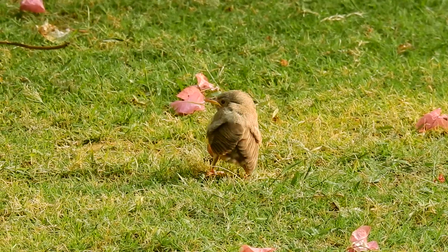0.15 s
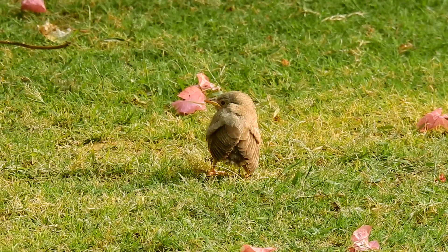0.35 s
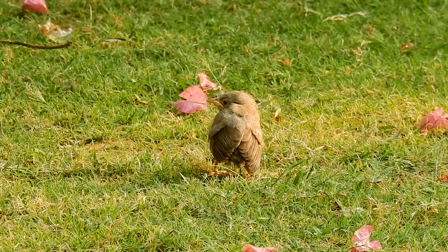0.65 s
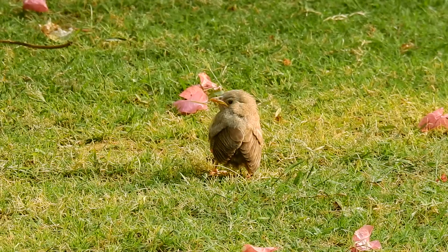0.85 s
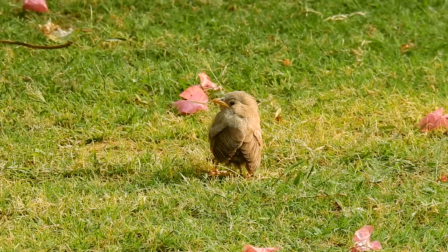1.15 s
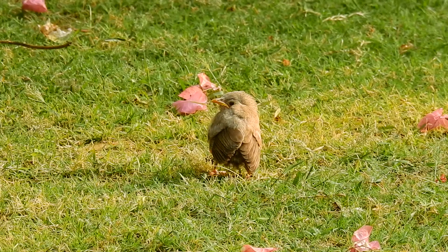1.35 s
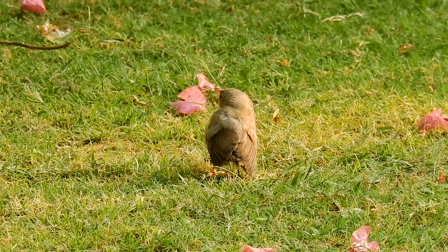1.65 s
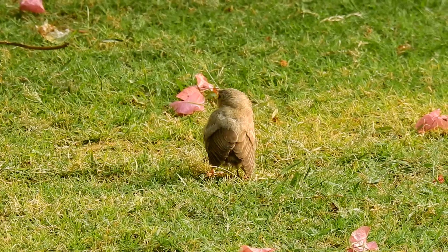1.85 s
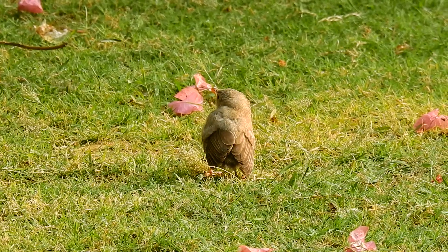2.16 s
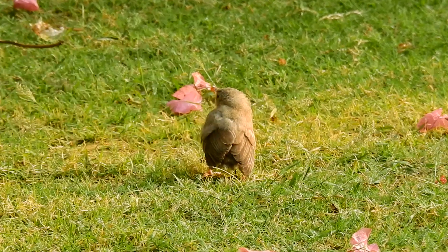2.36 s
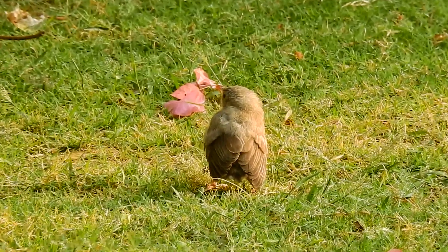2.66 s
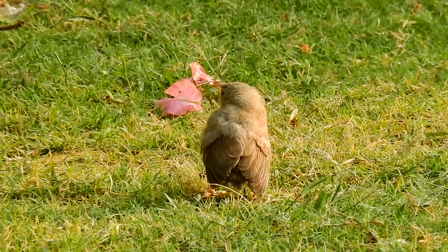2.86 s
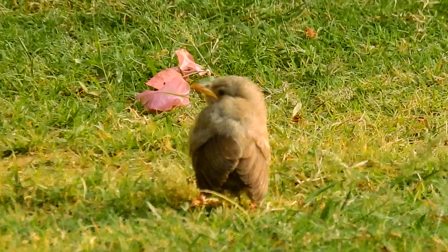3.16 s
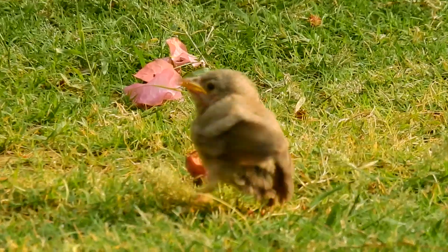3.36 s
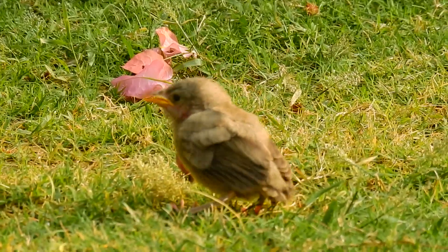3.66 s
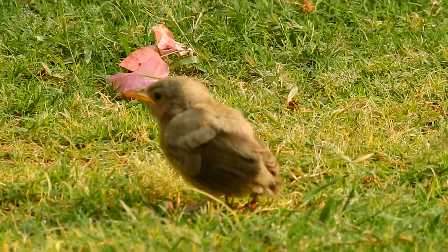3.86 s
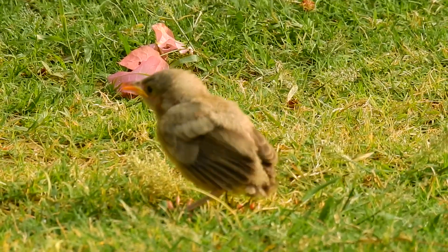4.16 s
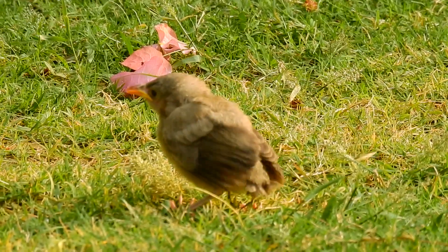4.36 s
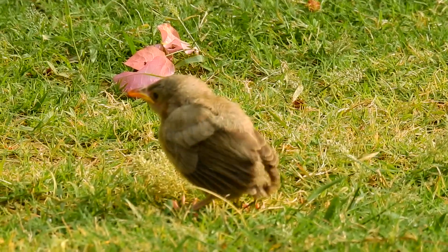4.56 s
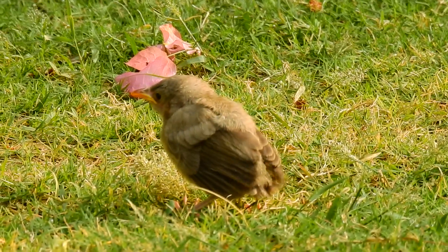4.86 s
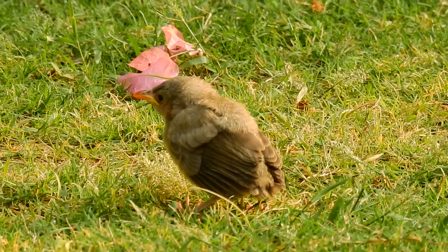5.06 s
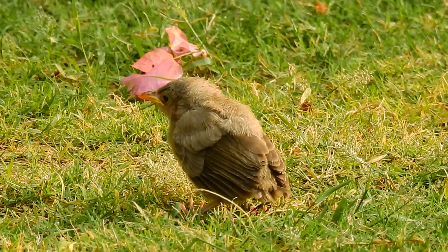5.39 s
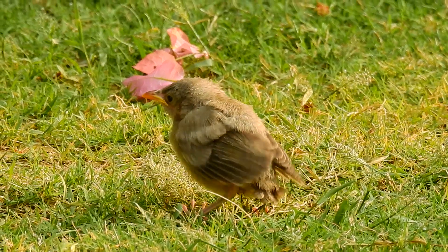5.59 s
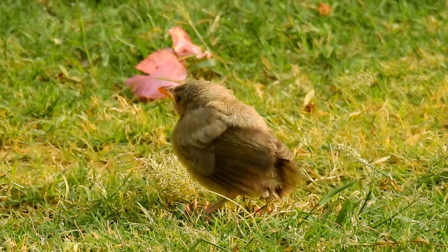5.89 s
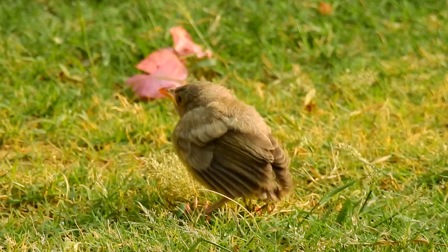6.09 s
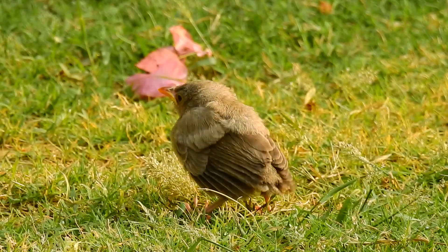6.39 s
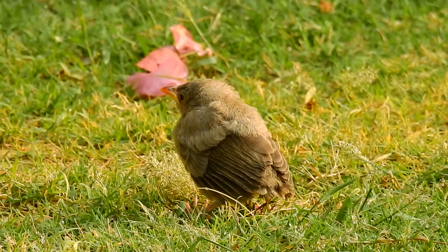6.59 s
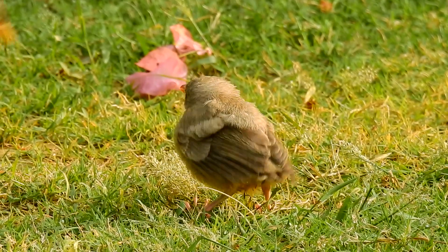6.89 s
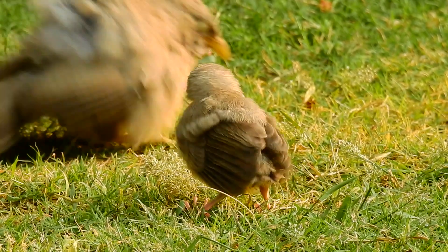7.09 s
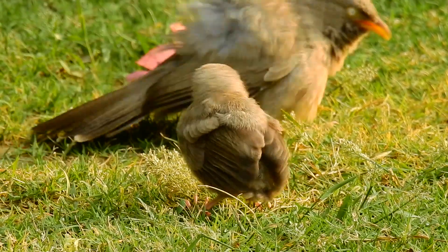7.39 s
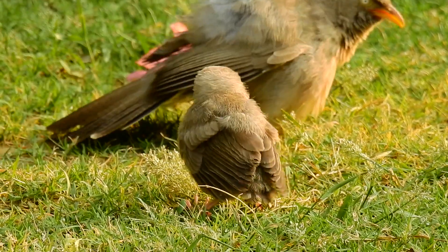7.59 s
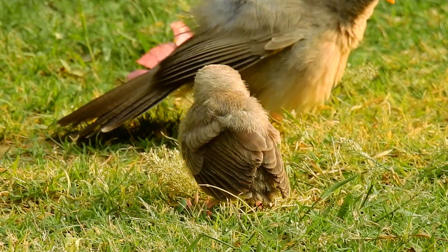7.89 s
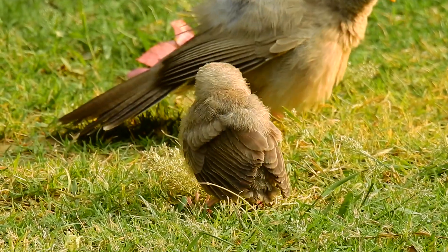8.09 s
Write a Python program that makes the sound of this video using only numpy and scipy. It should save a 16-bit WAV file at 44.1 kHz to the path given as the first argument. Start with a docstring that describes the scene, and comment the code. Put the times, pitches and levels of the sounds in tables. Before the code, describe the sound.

A group of birds chirps, squawks and gives short downward-sliding whistles, often overlapping, against faint outdoor air.

```python
"""A family of babblers calls on a garden lawn, over a low rumble and the hiss of the air.
Falling begging whistles open the scene, with scuffs close by. Near 1 s buzzy, frequency-modulated chips
join in and a bigger bird calls far off; until about 3 s a hand-held camera body booms at its resonance.
From 1.5 s come harsh nasal squawks, syrinx pulses filtered by throat and beak, thickest around 4 s.
Grass ticks in the later seconds as the calls go on, and walls and trees reflect them to the end."""
import sys
import numpy as np
from scipy import signal
from scipy.fft import rfft, irfft
from scipy.io import wavfile
from scipy.ndimage import uniform_filter1d

SR = 44100
rng = np.random.default_rng(int(sys.argv[2]) if len(sys.argv) > 2 else 0)


def dump(signal):
    """Clip the signal to [-1, 1] and save it as 16-bit WAV at the path in sys.argv[1]."""
    limited = np.clip(np.atleast_2d(signal).T, -1, 1)
    pcm = np.round(limited * 32767).astype(np.int16)
    wavfile.write(sys.argv[1], SR, pcm)


N = 363384

# Levels in the tables are those of the sources, ahead of echoes and mixing gains.
# begging whistles: start_s, clears_s, end_s, start_hz, mid_hz, end_hz, level_db, relative_octave_db
WHISTLES = [ (0.072, .2, 0.32, 3975, 3680, 3596, -50.5, -27),
            (0.696, 0.828, 1.044, 4048, 3680, 3430, -38.5, -40),
            (2.438, 2.6, 2.75, 3960, 3674, 3364, -42.5, -18.5),
            (2.791, 2.913, 3.16, 4175, 3695, 3440, -35.5, -28),
            (4.512, 4.569, 4.61, 3854, 3440, 3040, -42, -13),
            (4.968, 5.117, 5.355, 4000, 3616, 3302, -37, -19.5),
            (5.418, 5.524, 5.61, 3840, 3690, 3470, -47, -15),
            (5.767, 5.816, 5.86, 3950, 3580, 3470, -53, -16),
            (6.229, 6.355, 6.475, 3750, 3675, 3430, -55.5, -27),
            (6.521, 6.726, 6.946, 4076, 3657, 3408, -35.5, -24.5),
            (7.479, 7.655, 7.76, 3900, 3736, 3435, -47, -24),
            (7.952, 8.083, 8.24, 3850, 3582, 3430, -47.5, -35)]
# nasal calls: start_s, break_s, end_s, attack_s, effort_db, pitch_hz, first_roughness (0-1),
# last_roughness (0-1), throat_hz, upper_resonance_db, fundamental_db
NASALS = [ (1.55, 1.593, 1.66, 0.046, -34.5, 1187, 0.42, 0.65, 2090, -13.5, 0.5),
          (1.865, 1.902, 1.965, 0.0058, -36, 1192, 0.57, 0.83, 3680, -21, -16),
          (3.443, 3.503, 3.56, 0.027, -25, 1268, 0.46, 0.54, 3190, -13.5, -10.5),
          (4.864, 4.933, 4.96, .019, -31, 1203, 0.47, .75, 2920, -15, -19),
          (7.012, 7.109, 7.2, 0.024, -26, 1280, .48, 0.88, 3750, -13, -31.5),
          (7.295, 7.396, 7.375, 0.02, -28.5, 1250, 0.54, 0.4, 2580, -25, -24),
          (8.03, 8.119, 8.125, 0.025, -46, 1215, 0.33, .45, 2000, -25, -29)]
# rasps: start_s, crest_s, end_s, then at the crest: effort_db, pitch_hz, roughness (0-1), throat_hz,
# upper_resonance_db, spill_db
RASPS = [ (1.632, 1.7, 1.77, -34, 1240, 0.78, 2830, -17, -2),
         (1.749, 1.789, 1.9, -31.5, 1020, 0.74, 3100, -20.5, -18),
         (3.514, 3.549, 3.62, -29, 1169, 0.5, 2980, -13, -5),
         (3.601, 3.669, 3.74, -36.5, 962, 0.55, 2860, -12.5, -2.5),
         (3.723, 3.781, 3.85, -27, 1085, 0.83, 3300, -23, -22),
         (3.775, 3.853, 3.905, -24.5, 1254, 0.96, 3550, -3, -15),
         (3.97, 3.992, 4.07, -41, 1472, 0.52, 2820, -34, -24),
         (4.045, 4.118, 4.175, -29.5, 1039, 0.86, 3110, -13, -15),
         (4.262, 4.274, 4.34, -46.5, 1438, 0.64, 2770, -35, -17),
         (4.322, 4.4, 4.48, -31.5, 1030, 0.71, 3200, -12.5, -18),
         (4.887, 4.963, 5.09, -31, 1200, 0.67, 3320, -16, -10),
         (7.339, 7.376, 7.52, -32.5, 1364, 0.8, 2970, -31, -39),
         (7.42, 7.499, 7.61, -37, 1258, 0.65, 2470, -62, -28),
         (7.53, 7.589, 7.7, -43.5, 1058, 0.7, 2150, -34, -18)]
# buzzy chips: start_s, end_s, pitch_hz, glide_share, level_db
CHIPS = [ (0.986, 1.056, 5740, -0.0017, -32), (1.01, 1.063, 6980, -0.029, -46.5),
         (1.26, 1.352, 5580, 0.11, -29), (2.345, 2.428, 5760, -0.092, -35.5),
         (2.534, 2.603, 4320, 0.25, -49.5), (2.72, 2.82, 4260, 0.21, -32.5), (3.034, 3.142, 4084, 0.3, -33),
         (3.319, 3.387, 5620, 0.024, -46), (6.577, 6.685, 5300, .13, -39.5),
         (7.791, 7.87, 5030, 0.077, -49.5)]
# short clear tones (peeps, and ringing partials and tails of the squawks, chips and whistles):
# start_s, end_s, pitch_hz, glide_share, level_db
CLEAR_TONES = [ (0.365, 0.384, 1484, 0.022, -37), (0.369, 0.423, 4560, -0.12, -47),
               (1.585, 1.601, 3337, -0.014, -38), (1.711, 1.835, 6010, -0.0081, -50),
               (1.764, 1.795, 3060, 0.025, -34), (1.908, 1.929, 1672, 0.0021, -43.5),
               (1.923, 1.951, 2110, 0.003, -40), (2.034, 2.057, 2300, -0.057, -51),
               (2.144, 2.17, 2055, -0.005, -55), (2.429, 2.567, 3256, -0.023, -40.5),
               (2.775, 2.832, 5100, 0.013, -36.5), (3.088, 3.147, 5080, 0.025, -39),
               (3.232, 3.258, 2640, 0.025, -45.5), (3.636, 3.675, 2020, -.04, -42),
               (3.65, 3.685, 3900, -0.038, -37.5), (3.789, 3.861, 1398, 0.11, -41),
               (3.879, 3.929, 4450, -0.047, -40.5), (4.014, 4.063, 1583, -0.021, -44.5),
               (4.488, 4.53, 5080, -0.029, -47), (4.93, 5.019, 4870, 0.066, -40),
               (5.144, 5.205, 2576, -0.079, -36), (5.971, 6.03, 4730, 0.051, -54.5),
               (6.01, 6.082, 6490, .015, -50.5), (6.42, 6.454, 2290, 0.084, -44),
               (6.472, 6.508, 2885, -0.06, -40.5), (6.5, 6.533, 2140, -0.01, -44.5),
               (7.007, 7.03, 4550, -0.087, -36.5), (7.011, 7.033, 8870, -0.14, -49),
               (7.084, 7.098, 2533, -0.011, -35), (7.127, 7.181, 2071, -.02, -41),
               (7.163, 7.178, 4406, 0.016, -23), (7.332, 7.353, 2470, 0.0012, -27)]
# calls of the bigger bird: start_s, end_s, pitch_hz, fundamental_db, octave_db, flutter_share
FAR_CALLS = [ (0.924, 1.022, 622.3, -38.5, -52.5, 0.075), (1.039, 1.102, 625, -43.5, -66, 0.064),
             (1.15, 1.233, 607.4, -52, -50.5, 0.14), (1.181, 1.322, 686, -50.5, -52.5, 0.055),
             (3.276, 3.35, 987, -53, -74, 0.096), (5.517, 5.735, 578, -57, -56, .12),
             (7.838, 7.898, 830, -67, -54.5, 0.12)]
# scuffs close by: start_s, level_db, rise_s, decay_s, lower_ring_hz, upper_ring_hz, relative_upper_db
SCUFFS = [ (0.356, -40.5, 0.0033, 0.013, 2840, 6600, -7), (.47, -52.5, 0.0036, 0.014, 2200, 6650, -3),
          (.579, -47, 0.003, 0.021, 2600, 7020, 3.5), (.635, -37, 0.0022, 0.0023, 1710, 2580, 0),
          (.644, -39, 0.001, 0.0068, 1770, 2600, -6), (1.484, -38.5, 0.0027, 0.0038, 2700, 4220, -4),
          (1.64, -32, 0.0042, 0.0071, 2460, 6860, -5.5)]
# taps and soft knocks: start_s, level_db, centre_hz, width_hz, rise_s, decay_s
KNOCKS = [(.364, -36.5, 1400, 695, 0.0045, 0.009), (.374, -39, 900, 1300, .002, 0.0055),
          (.376, -30.5, 4200, 2000, .001, 0.0032), (1.637, -25, 507, 590, 0.0018, 0.015)]
# ticks in the grass: start_s, level_db, centre_hz, decay_s
TICKS = [(3.291, -45.5, 6100, 0.0096), (4.857, -48, 9100, 0.0059), (4.88, -54, 9650, 0.01),
         (5.105, -60, 8500, 0.0067), (5.205, -61, 9300, .005), (5.63, -47, 7600, 0.0035),
         (5.644, -52, 7840, .004), (6.183, -45.5, 6900, 0.0047), (6.2, -53, 7200, .005),
         (6.268, -63, 9300, .004), (6.799, -52, 9900, 0.0024), (6.807, -54, 10200, .003)]
# booms of the camera body: start_s, end_s, level_db
BOOMS = [(.56, 0.76, -40), (1.30, 1.51, -36), (1.69, 1.788, -32), (1.83, 1.968, -32.5), (1.96, 2.038, -27),
         (2.04, 2.11, -34.5), (2.31, 2.552, -31.5), (2.68, 2.88, -39.5), (2.95, 3.24, -42.5)]
# course of the low rumble and of the garden air: time_s, level_db
RUMBLE_LEVEL = [(0, -55.5), (.6, -51), (1.9, -45), (3.2, -43), (3.35, -51), (4.3, -49.5), (5.3, -47.5),
                (7.4, -48), (8.24, -52)]
AIR_LEVEL = [(0, -54), (1, -49.5), (2.2, -51), (3, -48), (4.7, -50.5), (6, -54.5), (7.4, -50), (8.24, -53)]
# their spectra: frequency_hz, relative_density_db
RUMBLE_SPECTRUM = [(25, -58), (50, -48), (70, -11.5), (100, -20.5), (135, -15), (162, 2), (185, -5.5),
                   (240, -10.5), (330, -28), (600, -59)]
AIR_SPECTRUM = [(30, -53), (60, -27.5), (120, -4.5), (280, -3), (450, -3.5), (700, -8), (1200, -12),
                (2200, -15.5), (4000, -15), (6800, -16), (8200, -26.5), (10000, -41), (14000, -63.5)]
# left-right likeness of both noises: frequency_hz, correlation (0-1)
NOISE_COHERENCE = [(40, 0.92), (140, 1), (700, .98), (2000, 0.98), (5000, 0.24), (9000, 0.081)]
# reverberation time among the trees: frequency_hz, t60_s
TREE_T60 = [(500, 0.52), (2000, 0.27), (4000, 0.26), (8000, 0.16)]
# weight of the difference between the two microphones: frequency_hz, gain_db
STEREO_WIDTH = [(300, -24), (650, -18), (1200, -5), (4000, -4), (9000, 6.5)]

FULL_WHISTLE_DB, SWING_DB_PER_DB = -35, .25  # a weaker whistle swings less widely
HOARSE_SWING_HZ, CLEAR_SWING_HZ, WAVER_HZ = 190, 58, 27  # swings at full effort; slow waver
HOARSE_DB, LATE_DB = -3.5, -7.5  # opening and ending of a whistle, against its middle
CLEAR_STEP_HZ, CLEARING_S = 87.5, .004  # pitch step if the voice clears midway, less near the ends
END_DROOP_HZ, END_DROOP_S = 109, 0.037  # the pitch sinks as the breath runs out
ONSET_DB, CUTOFF_DB, RELEASE_S = -19, -22, 0.022  # envelope of a nasal call
BREAK_S, PITCH_DROP, ROUGH_LAG_S = 0.025, .2, .018  # its break: pitch drops, roughness follows
RASP_RISE_DB, RASP_FALL_DB, RASP_ARCH = -12, -20, 1.71  # envelope of a rasp
ROUGH_PER_DB, RASP_SAG_PER_S = -0.27, 1.3  # a rasp roughens off its crest; its pitch sinks steadily
THROAT_HZ_PER_DB = 23.5  # the throat resonance rises as the beak opens with effort
BEAK_LOW_HZ, BEAK_HIGH_HZ = 1390, 7320  # the band that a babbler radiates well
RATTLE_HZ, RATTLE_DB = 280, 4  # amplitude modulation of a fully rough voice
CHIP_FLUTTER_SHARE, CLEAR_TONE_FLUTTER_HZ = .075, 90


def whistle(start, clears, end, start_hz, mid_hz, end_hz, db, octave_db):
    """Frequency modulation makes a falling tone hoarse; it narrows as the voice clears, then widens."""
    t = np.arange(start, end, 1 / SR)
    progress = np.linspace(0, 1, len(t))
    opened = .5 + .5 * np.tanh((t - clears) / CLEARING_S)
    fading = np.interp(progress, [.68, .95], [0, 1])
    clear = opened * (1 - .5 * fading)
    push = gain_of(SWING_DB_PER_DB * (db - FULL_WHISTLE_DB))
    depth_hz = push * (HOARSE_SWING_HZ * (1 - clear) + CLEAR_SWING_HZ * clear)
    swing = depth_hz * flutter(len(t), rate_hz=140, unevenness=.3)
    slide = np.polyval(np.polyfit([0, .5, 1], [start_hz, mid_hz, end_hz], 2), progress)
    step = CLEAR_STEP_HZ * (progress - opened) * np.sin(np.pi * progress)
    droop = END_DROOP_HZ * np.exp((t - end) / END_DROOP_S)
    phase = phase_of(slide + step - droop + swing + WAVER_HZ * wander(len(t), rate_hz=60))
    level_db = db + HOARSE_DB * (1 - opened) + LATE_DB * fading
    tremble_db = (3.3 - 1.1 * clear) * wander(len(t), rate_hz=90)
    onset_db = -7 * np.exp(-progress / 0.05)
    tone = np.sin(phase) + gain_of(octave_db) * (1 - progress) * np.sin(2 * phase)
    return start, gain_of(level_db + tremble_db + onset_db) * unit_rms(tone) * tukey(len(t), .1)


def nasal(start, breaks, end, attack, db, hz, first_rough, last_rough, throat_hz, upper_db, low_db):
    """A register break: a reedy note swells, then drops in pitch and mostly turns rougher."""
    t = np.arange(start, end, 1 / SR)
    swell_db = ONSET_DB * np.exp((start - t) / attack) + CUTOFF_DB * np.exp((t - end) / RELEASE_S)
    broken = .5 + .5 * np.tanh((t - breaks) / BREAK_S)
    rough = first_rough + (last_rough - first_rough) * np.interp(t - ROUGH_LAG_S, t, broken)
    pitch = hz * (1 - PITCH_DROP * broken)
    throat = throat_hz + THROAT_HZ_PER_DB * swell_db
    return squawk(t, db + swell_db, pitch, rough, throat, upper_db, spill_db=-18.5, fundamental_db=low_db)


def rasp(start, crest, end, db, hz, crest_rough, throat_hz, upper_db, spill_db):
    """Effort governs timbre: level, throat resonance and treble rise and fall in one harsh push."""
    t = np.arange(start, end, 1 / SR)
    off_crest = np.interp(t, [start, crest, end], [1, 0, 1])
    swell_db = np.where(t < crest, RASP_RISE_DB, RASP_FALL_DB) * off_crest ** RASP_ARCH
    rough = crest_rough + ROUGH_PER_DB * swell_db
    pitch = hz * (1 - RASP_SAG_PER_S * (t - crest))
    throat = throat_hz + THROAT_HZ_PER_DB * swell_db
    return squawk(t, db + swell_db, pitch, rough, throat, upper_db + swell_db, spill_db)


def squawk(t, effort_db, hz, rough, throat_hz, upper_db, spill_db, fundamental_db=-23):
    """Source and filter: harmonics and breath noise from the syrinx are shaped by throat and beak."""
    size = len(t)
    rough = np.clip(rough, 0, 1)
    jitter = 0.106 * rough ** 2 * wander(size, rate_hz=250)
    phase = phase_of(hz * (1 + jitter))
    harmonics = [gain_of(3.8 * wander(size, rate_hz=100)) * np.cos(k * phase) for k in range(1, 11)]
    # air hisses through the syrinx each time it opens
    breath = .65 * rough ** 2 * (1 + np.cos(phase)) * rng.standard_normal(size)
    drive = unit_rms(sum(harmonics)) + breath
    # a wide-open beak lets out more treble and damps the throat, which broadens it
    throat_width_hz = 1100 * np.exp(0.016 * (np.mean(upper_db) + 28.5))
    body = resonate(drive, throat_hz + 200 * rough * wander(size, rate_hz=13.3), throat_width_hz)
    # the more sound spills past the throat, the wider its band
    spill = resonate(drive, throat_hz + 250, width_hz=2800 * (0.78 + gain_of(spill_db)), order=6)
    upper = resonate(drive, hz=6900, width_hz=1300)
    voice = body + gain_of(spill_db) * spill + gain_of(upper_db) * upper
    voice = signal.sosfilt(signal.butter(2, BEAK_LOW_HZ, "high", fs=SR, output="sos"), voice)
    voice = signal.sosfilt(signal.butter(14, BEAK_HIGH_HZ, fs=SR, output="sos"), voice)
    # only the hardest pushes wake the top resonance
    voice += gain_of(2.6 * upper_db - 24.5) * resonate(drive, hz=11300, width_hz=1500, order=4)
    voice += gain_of(fundamental_db) * np.cos(phase)  # the fundamental leaks past the throat
    rattle_db = rough ** 2 * RATTLE_DB * flutter(size, RATTLE_HZ, unevenness=.3)
    tremble_db = 2.2 * rough * wander(size, rate_hz=90)
    return t[0], gain_of(effort_db + rattle_db + tremble_db) * unit_rms(voice) * tukey(size, .04)


def chip(start, end, start_hz, glide, db, flutter_hz, rate_hz, taper):
    """Fast frequency modulation adds sidebands to a short glide; a wide swing is heard as a buzz."""
    size = round((end - start) * SR)
    progress = np.linspace(0, 1, size)
    swing = flutter_hz * flutter(size, rate_hz, unevenness=0.436)
    hz = start_hz * (1 + glide * np.sin(progress * np.pi / 2)) + swing
    tremble = gain_of(3.5 * wander(size, rate_hz / 2))
    tone = unit_rms(np.sin(phase_of(hz)) * tremble)
    return start, gain_of(db + 3.5 * (1 - progress)) * tone * tukey(size, taper)


def small_notes():
    """Modulation depth sets the timbre: wide in buzzy chips and chatter, narrow in short clear tones."""
    buzzy = [chip(start, end, hz, glide, db, CHIP_FLUTTER_SHARE * hz, rate_hz=240, taper=0.54)
             for start, end, hz, glide, db in CHIPS + chatter()]
    clear = [chip(*row, CLEAR_TONE_FLUTTER_HZ, rate_hz=260, taper=0.25) for row in CLEAR_TONES]
    return gather(buzzy + clear)


def chatter(db=-61, low_hz=900, high_hz=6500, count=80):
    """Independent callers around the garden give faint notes at random times, as rows like CHIPS."""
    rows = []
    for when, length, pitch, glide, loudness in rng.random((count, 5)):
        start, hz = when * N / SR, low_hz * (high_hz / low_hz) ** pitch
        end = start + 0.0582 + 0.109 * length
        rows.append((start, end, hz, 0.19 * glide - .12, db + 6 * (loudness - .5)))
    return rows


def far_bird(sag_share=.035, third_db=-12):
    """Attenuation with distance: only three harmonics of the bigger bird's sagging notes arrive."""
    return gather(chip(start, end, k * hz, -sag_share, db, hoarse * k * hz, rate_hz=90, taper=0.55)
                  for start, end, hz, low_db, octave_db, hoarse in FAR_CALLS
                  for k, db in enumerate([low_db, octave_db, octave_db + third_db], 1))


def far_flock(db=-66, low_hz=450, high_hz=1300, count=26, sag_share=0.0997):
    """Harmonic series of three partials glide down: faint calls from distant trees."""
    notes = []
    for when, length, pitch, loudness in rng.random((count, 4)):
        start, hz = when * N / SR, low_hz * (high_hz / low_hz) ** pitch
        end = start + 0.0503 + 0.0814 * length
        level_db = db + 6 * (loudness - .5)
        notes += [chip(start, end, k * hz, -sag_share, level_db, 0.025 * k * hz, rate_hz=90, taper=0.8)
                  for k in (1, 2, 3)]
    return gather(notes)


def burst(start, db, hz, width_hz, rise_s, decay_s):
    """Contact noise in one broad resonance rises linearly and decays exponentially."""
    t = np.arange(SR // 5) / SR
    envelope = np.minimum(t / rise_s, 1) * np.exp(-np.maximum(t - rise_s, 0) / decay_s)
    return start, gain_of(db) * envelope * resonate(rng.standard_normal(len(t)), hz, width_hz, order=3)


def contacts(ring_width_share=0.18, hiss_db=-4):
    """Contact excites resonances: two rings over a broad hiss in a scuff, a single band in a knock."""
    scuffs = []
    for start, db, rise, decay, low_hz, high_hz, high_db in SCUFFS:
        for hz, ring_db in [(low_hz, 0), (high_hz, high_db)]:
            scuffs.append(burst(start, db + ring_db, hz, ring_width_share * hz, rise, decay))
        scuffs.append(burst(start, db + hiss_db, hz=3700, width_hz=3800, rise_s=rise, decay_s=decay))
    knocks = [burst(*row) for row in KNOCKS]
    return signal.sosfilt(signal.butter(2, 190, "high", fs=SR, output="sos"), gather(scuffs + knocks))


def grass_ticks():
    """Dry blades of grass snap; so brief a transient has a broad spectrum."""
    return gather(burst(start, db, hz, width_hz=3500, rise_s=0.00069, decay_s=decay)
                  for start, db, hz, decay in TICKS)


def boom(start, end, db, hz=162, waver_hz=13):
    """Forced vibration: the shifting hand drives the camera body at its one low resonance."""
    size = round((end - start) * SR)
    phase = phase_of(hz + waver_hz * wander(size, rate_hz=71))
    tone = unit_rms(np.sin(phase) * tukey(size, .7))
    return start, gain_of(db + 2 * wander(size, rate_hz=50)) * tone


def background(spectrum, levels, patchy_db):
    """Partly coherent outdoor noise with drifting patches, nearly alike on both sides in the bass."""
    hz = np.fft.rfftfreq(2048, 1 / SR)
    real, imag, other_real, other_imag, patches = rng.standard_normal((N // 512 + 5, len(hz), 5)).T
    patches = unit_rms(uniform_filter1d(uniform_filter1d(patches, 20, axis=0), 10, axis=1))
    coherence = at_frequency(NOISE_COHERENCE, hz)[:, None]
    left = real + 1j * imag
    right = coherence * left + np.sqrt(1 - coherence ** 2) * (other_real + 1j * other_imag)
    spectra = np.array([left, right]) * gain_of(at_frequency(spectrum, hz)[:, None] + patchy_db * patches)
    noise = unit_rms(signal.istft(spectra, nperseg=2048, noverlap=1536)[1][:, :N])
    return noise * gain_of(np.interp(np.arange(N) / SR, *np.transpose(levels)))


def garden(x, walls_db, trees_db, right_db, wall_decay_s, sideways=0.6, echoes_per_s=500):
    """Direct sound is joined by early reflections from walls and diffuse reverberation from trees."""
    t = np.arange(SR // 2) / SR
    walls = rng.standard_normal(len(t)) * (rng.random(len(t)) < echoes_per_s / SR)
    walls *= (t > .003) * np.exp(-t / wall_decay_s)
    hz, when, spectra = signal.stft(rng.standard_normal((2, len(t))) * (t > .004), SR, nperseg=256)
    decay = gain_of(-60 * when / at_frequency(TREE_T60, hz)[:, None])
    trees = signal.istft(spectra * decay, SR, nperseg=256)[1][:, :len(t)]
    directions = 1 + sideways * rng.standard_normal(len(t)) * np.array([[1], [-1]])
    walls = walls / np.linalg.norm(walls) * directions
    response = gain_of(walls_db) * walls + gain_of(trees_db) * trees / np.linalg.norm(trees[0])
    echoes = signal.fftconvolve(x[None], response, axes=1)[:, :N]
    return (x + echoes) * gain_of([[-right_db / 2], [right_db / 2]])


def microphones(x):
    """Two close capsules receive long wavelengths alike and differ in the treble."""
    mid, side = x.mean(0), (x[0] - x[1]) / 2
    side = irfft(rfft(side) * gain_of(at_frequency(STEREO_WIDTH, np.fft.rfftfreq(N, 1 / SR))), N)
    return np.array([mid + side, mid - side])


def resonate(x, hz, width_hz, order=2):
    """A movable resonance by heterodyning: shift down, low-pass, shift back, scale to rms 1."""
    carrier = np.exp(1j * phase_of(hz * np.ones(len(x))))
    lowpass = signal.butter(order, min(abs(width_hz), SR / 2) / 2, fs=SR, output="sos")
    return unit_rms((carrier * signal.sosfilt(lowpass, x / carrier)).real)


def flutter(size, rate_hz, unevenness):
    """An oscillation between -1 and 1 at an unsteady rate."""
    return np.sin(phase_of(rate_hz * (1 + unevenness * wander(size, rate_hz))))


def wander(size, rate_hz, hop=16):
    """Low-passed noise: a random drift of rms about 1."""
    hz = np.fft.rfftfreq(2048, hop / SR)
    drift = unit_rms(irfft(rfft(rng.standard_normal(2048)) / (1 + (hz / rate_hz) ** 4)))
    return np.interp(np.arange(size), hop * np.arange(len(drift)), drift)


def phase_of(hz):
    """Phase is the integral of frequency."""
    return 2 * np.pi * np.cumsum(hz) / SR


def tukey(size, taper):
    """A flat envelope with cosine ends."""
    return signal.windows.tukey(size, taper)


def gain_of(db):
    """Decibels to amplitude."""
    return 10 ** (np.asarray(db) / 20)


def unit_rms(x):
    """Scales to rms 1."""
    return x / np.sqrt(np.mean(x ** 2) + 1e-20)


def at_frequency(table, hz):
    """Interpolates on a log-frequency axis."""
    table_hz, values = np.transpose(table)
    return np.interp(np.log(hz + 1), np.log(table_hz + 1), values)


def gather(sounds):
    """Superposition of (start_s, sound) pairs on one track."""
    mix = np.zeros(N)
    for start, sound in sounds:
        part = mix[max(round(start * SR), 0):][:len(sound)]
        part += sound[:len(part)]
    return mix


def scene():
    """Sources add linearly; the birds sit to the right, and wall echoes last longest for the far ones."""
    whistles = gather(whistle(*row) for row in WHISTLES)
    whistles = garden(whistles, walls_db=-2.5, trees_db=-5, right_db=1, wall_decay_s=0.012)
    chips = garden(small_notes(), walls_db=-2, trees_db=-6, right_db=6.5, wall_decay_s=0.04)
    squawks = gather([nasal(*row) for row in NASALS] + [rasp(*row) for row in RASPS])
    squawks = garden(squawks, walls_db=0, trees_db=-5, right_db=4.5, wall_decay_s=0.0065)
    far = garden(far_bird() + far_flock(), walls_db=-2.5, trees_db=-12, right_db=7, wall_decay_s=0.088)
    scuffs = garden(contacts(), walls_db=-5.5, trees_db=-10, right_db=5.5, wall_decay_s=0.017)
    grass = garden(grass_ticks(), walls_db=-5, trees_db=-9, right_db=0, wall_decay_s=0.008)
    rumble = background(RUMBLE_SPECTRUM, RUMBLE_LEVEL, patchy_db=.6)
    air = background(AIR_SPECTRUM, AIR_LEVEL, patchy_db=1.6)
    booms = gather(boom(*row) for row in BOOMS)
    birds = gain_of(-0.5) * whistles + gain_of(-5) * chips + gain_of(-3) * squawks + gain_of(1.36) * far
    return microphones(birds + scuffs + grass) + air + gain_of(-2) * rumble + gain_of(-9) * booms


def record(dry):
    """Band limiting: a steep low-pass filter removes the highest treble."""
    lowpass = signal.firwin(511, cutoff=14400, window=("kaiser", 9), fs=SR)
    return signal.oaconvolve(dry, lowpass[None], "same")


dry = scene()
out = record(dry)
dump(out)
```